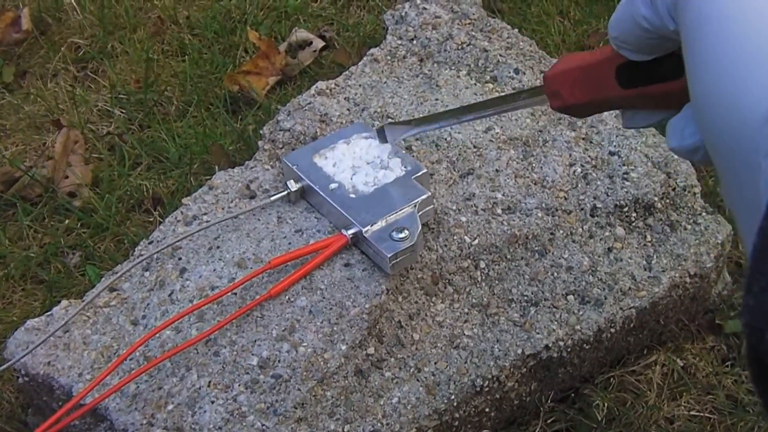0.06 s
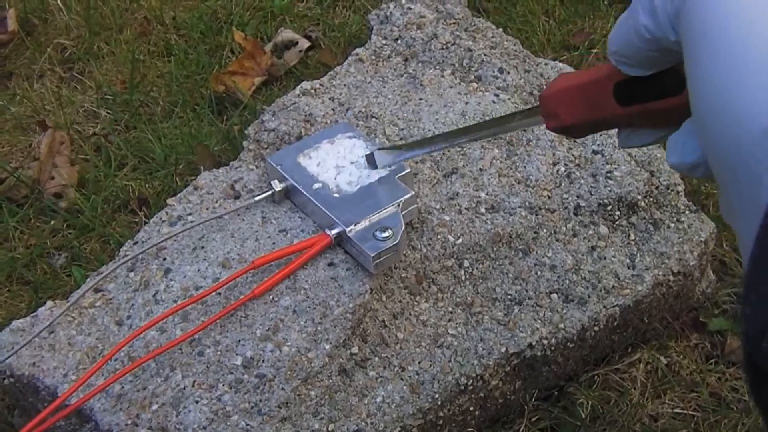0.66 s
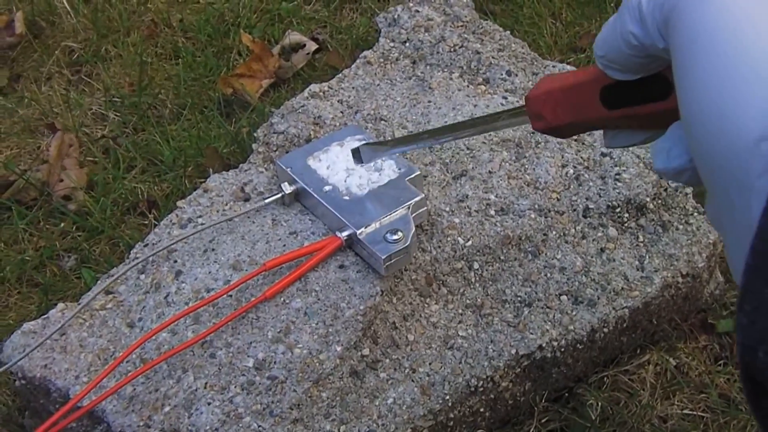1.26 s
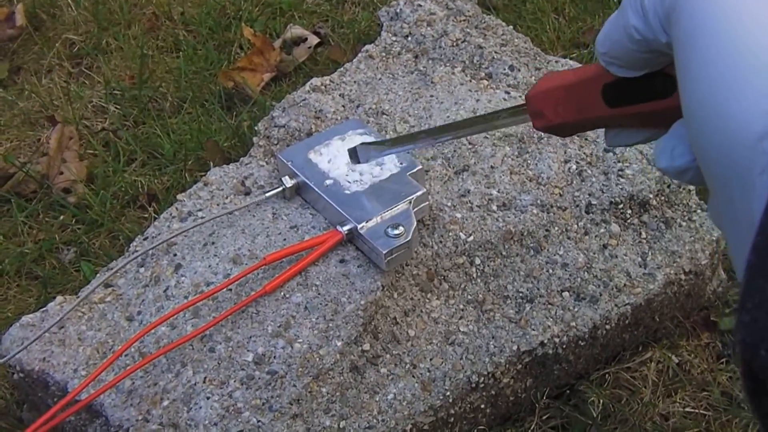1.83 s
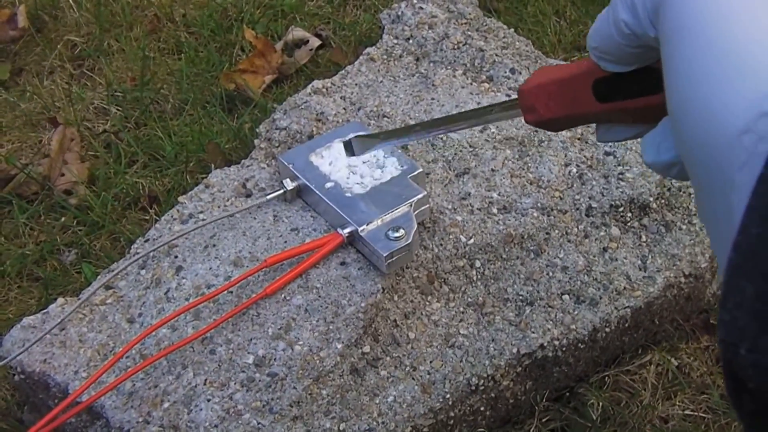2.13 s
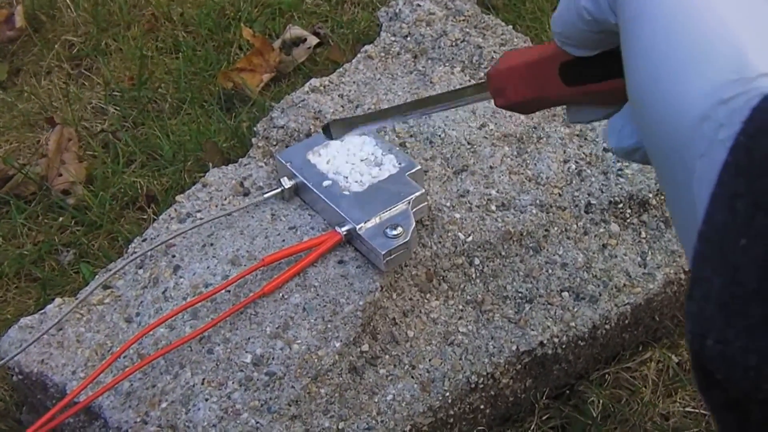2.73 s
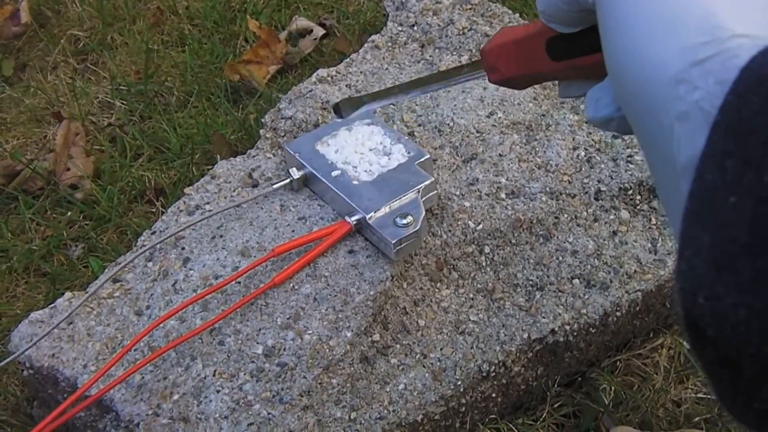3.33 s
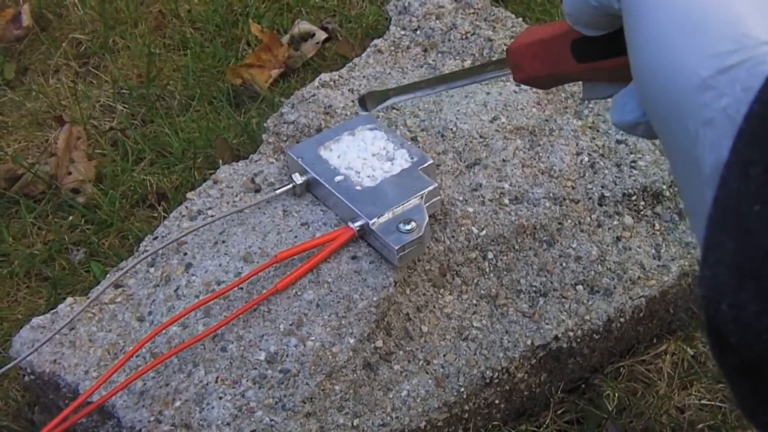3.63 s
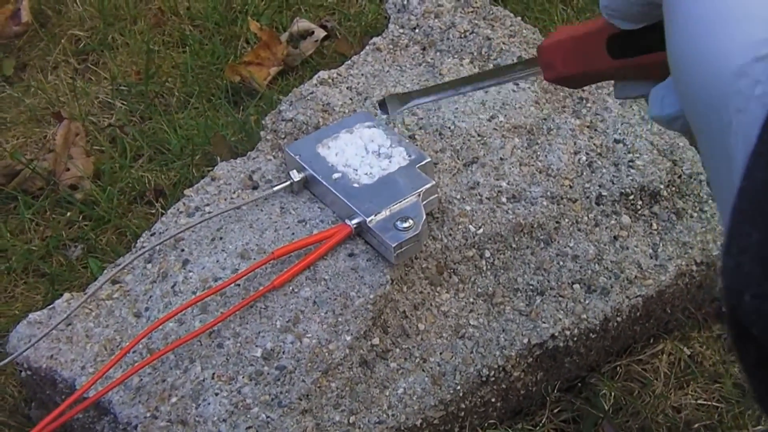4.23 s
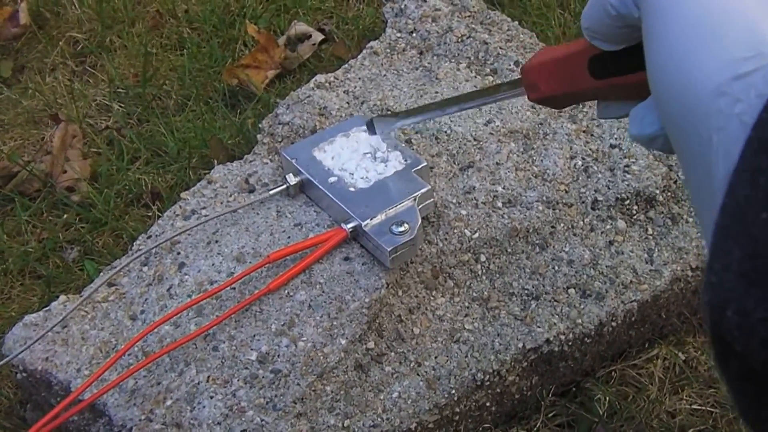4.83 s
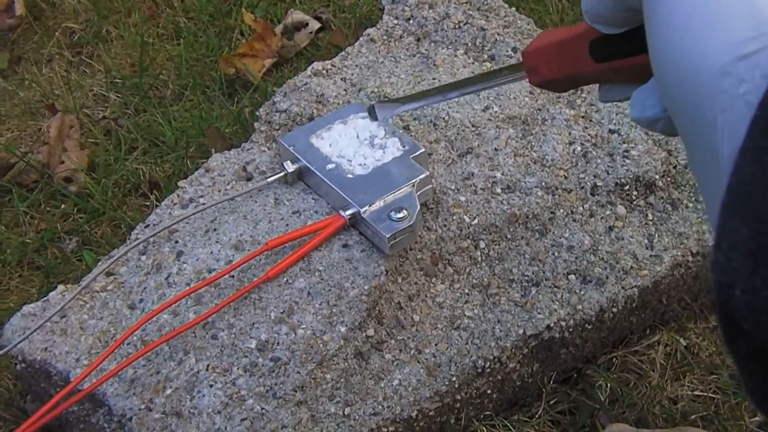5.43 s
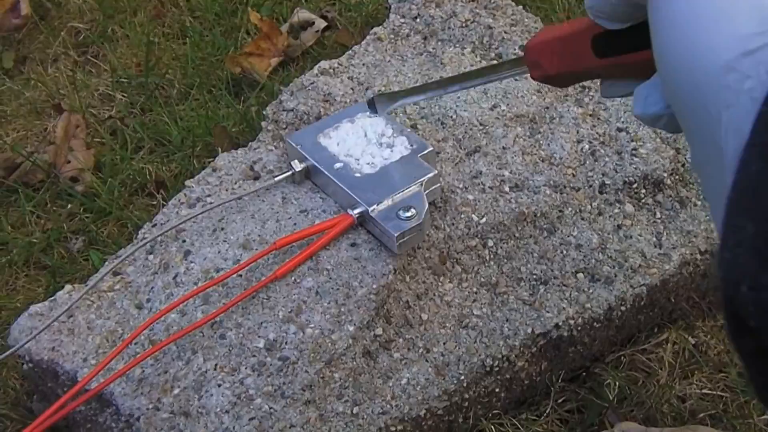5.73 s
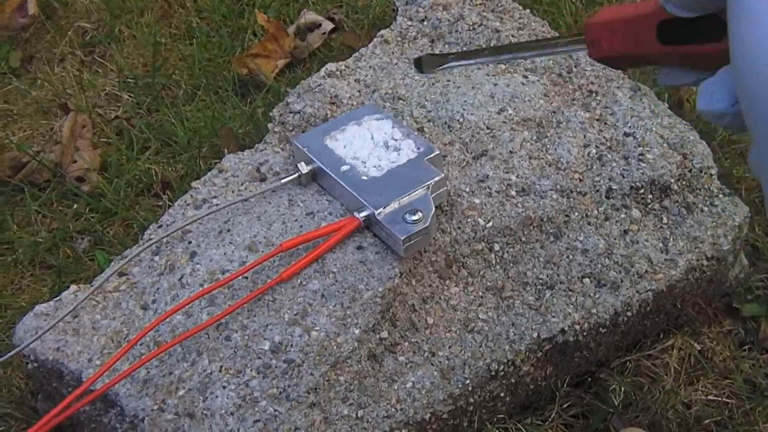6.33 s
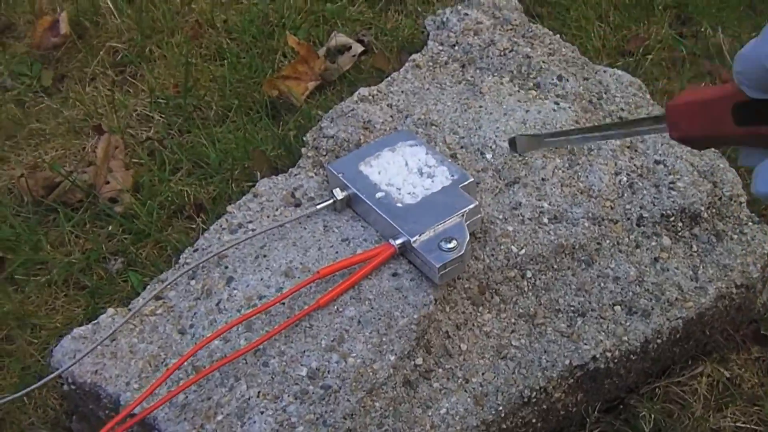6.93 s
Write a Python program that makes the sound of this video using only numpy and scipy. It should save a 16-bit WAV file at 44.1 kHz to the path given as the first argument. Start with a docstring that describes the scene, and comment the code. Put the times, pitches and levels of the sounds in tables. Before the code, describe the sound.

A screwdriver pokes caked crystals in a metal pan with light ringing ticks, then four loud clacks, over faint distant traffic.

```python
"""A steel screwdriver pokes at caked crystals in a small metal pan on a stone slab, outdoors.
Near the stereo microphone, each poke knocks dully and sets the steel ringing; the crust crunches faintly.
As the hand draws back, four hard clacks land close to the microphone and overload the recorder.
Far off, traffic passes and a small bird calls, over soft rustling and steady hiss."""
import sys
import numpy as np
from scipy import signal
from scipy.fft import rfft, irfft
from scipy.io import wavfile

SR = 44100
rng = np.random.default_rng(int(sys.argv[2]) if len(sys.argv) > 2 else 0)


def transcribe(signal):
    """Save signal, clipped to [-1, 1], as a 16-bit WAV file at the path in sys.argv[1]."""
    frames = np.atleast_2d(signal).T
    limited = np.clip(frames, -1, 1)
    pcm = np.round(limited * 32767).astype(np.int16)
    wavfile.write(sys.argv[1], SR, pcm)


N = 312228
TIME, RING_TIME = np.arange(N) / SR, np.arange(SR // 6) / SR
BINS = np.fft.rfftfreq(N, 1 / SR)

# spectra of the traffic's rumble, its tyre wash, the rustle and the hiss: f/Hz, relative level/dB
RUMBLE_SPECTRUM = [(20, -37), (35, -26), (50, -8), (62, -9), (80, -3), (105, 1), (140, -1.5), (200, -7.5),
                   (280, -22.5), (500, -41.5)]
TYRE_SPECTRUM = [(300, -8.5), (600, -10), (900, -3), (1200, -0.5), (1500, 2), (1800, -2), (2300, -4.5),
                 (3200, -7.5), (5000, -13.5), (8000, -39), (15000, -44)]
RUSTLE_SPECTRUM = [(200, -17), (290, -14), (390, 0), (480, -2), (650, -9), (900, -10), (1500, -35)]
HISS_SPECTRUM = [(100, -31), (3000, -5), (5500, 4.5), (7000, 2.5), (9000, 1), (12000, -1.5), (16000, -1.5)]
# likeness of the background at the two microphone ports: f/Hz, correlation (-1..1)
AIR_CORRELATION = [(60, 0.8), (130, 0.98), (290, 0.64), (640, 0.6), (1400, 0.75), (3100, -0.35),
                   (6800, -0.35), (15000, 0.13)]
# swells of the rustle: middle t/s, half width/s, level/dB
RUSTLE_SWELLS = [(0.03, 0.052, -52), (2.22, 0.26, -50.5), (3.6, 0.15, -55), (4.45, 0.33, -48.5),
                 (6.43, 0.24, -51)]
# a far bird's calls: t/s, level/dB
BIRD_CALLS = [(0.564, -61), (2.830, -63), (4.175, -65), (5.255, -63), (7.012, -64)]
# dull bumps of handling: t/s, level/dB, f/Hz
HANDLING_BUMPS = [(1.256, -31.5, 440), (3.5504, -31.5, 472), (3.983, -37, 129), (5.853, -29.5, 556)]
# crust crumbling under the tip: t/s, length/s, level/dB
CRUST_CRUNCHES = [(1.45, .010, -46), (1.459, .012, -47), (2.327, .008, -54), (2.574, .008, -50),
                  (2.613, .012, -50), (3.893, 0.045, -50.5), (4.023, .016, -48), (5.657, .012, -48)]
# close clacks: t/s, blow/dB, favoured f/Hz, fall below and above it/(dB/octave), bounce/ms, bounce/dB
CLACK_BLOWS = [(6.4351, -5.5, 2500, 20, 12, 1.177, -3), (6.6130, 3.5, 2720, 21, 6.5, 1.3, -6.5),
               (6.7488, 6.5, 3580, 8, 12.5, 0.538, -17.5), (6.9296, 0.3, 1660, 24.5, 7.5, 1.06, -8)]
# light pokes: t/s, knock/dB, knock's tilt/(dB/octave), ping/dB, grit/dB
TIP_POKES = [(0.9601, -26, -3, -33, -35), (0.9672, -32.5, 6, -30, -41), (1.1950, -38.5, -8, -45, -47),
             (1.4590, -46, 0, -47, -50), (1.6962, -26, -3.5, -32, -38), (1.7336, -41.5, -8, -50, -55),
             (2.0002, -30, 0, -32.5, -42), (2.0220, -35.5, -5, -49, -55), (2.8802, -33, 21, -31, -30.5),
             (3.4543, -21.5, 7, -46, -31), (3.7351, -29.5, -5, -37.5, -36.5), (3.7586, -26, 3, -48, -45),
             (3.7675, -33, 2, -46, -50), (4.7291, -20.5, 3.5, -33, -39), (5.0553, -20.5, 2, -34.5, -39),
             (5.3690, -31.5, -2, -44.5, -59), (6.4418, -29, 1, -47, -27), (6.4655, -42, 2, -54, -33),
             (6.4773, -37, 13, -56, -44), (6.7354, -34, 3, -52, -29)]
# modes of the body that clacks, the tip's knock, the steel's ping: f/Hz, relative level/dB, t60/s
BODY_MODES = [(830, 0.5, 0.0071), (1320, 2, 0.0072), (1690, -8.5, 0.012), (1915, -3, 0.0072),
              (2485, -8.5, 0.015), (2720, -4.5, 0.0045), (4187, 0.5, 0.0086), (4840, -4, 0.0053),
              (5660, 6.5, 0.0053), (6460, 1, 0.0094), (7260, 3.5, 0.0064), (8610, 3.5, 0.0045),
              (9670, 4, 0.0052), (10830, 3, 0.0027), (12510, 14.5, 0.0045), (15500, -4, 0.0029)]
KNOCK_MODES = [(435, -16.5, 0.023), (960, -2.5, 0.0065), (1280, -7, 0.012), (1770, 0, 0.011),
               (2070, 5.5, 0.008), (2566, -4.5, 0.013)]
PING_MODES = [(4740, -5, 0.018), (4850, -1, 0.068), (13500, -19, 0.023)]
# the steel's low tone and the slab's thud: f/Hz, relative level/dB, t60/s
STEEL_MODE = (1718, -8.5, 0.093)
SLAB_MODE = (483, -27, 0.017)
# near sounds at the left port against the right: f/Hz, level/dB
LEFT_SHADE = [(500, -3), (1300, -1), (2500, -1.5), (4200, 1.5), (5600, -10.5), (9000, -8.5), (12000, -5),
              (16000, -1)]
# how far the left port trails on near sounds: f/Hz, phase/rad
LEFT_PHASE_LAG = [(100, 0), (1000, 0.44), (2500, 0.54), (5500, 1.16), (7000, 2.47), (10500, 1), (12300, 8),
                  (16000, 8)]


def amp(db):
    """Decibels to gain."""
    return 10 ** (np.asarray(db) / 20)


def unit(x):
    """Scales to rms 1."""
    return x / np.sqrt(np.mean(x ** 2) + 1e-20)


def curve(points, hz):
    """Reads (f/Hz, value) rows on a log-frequency axis."""
    f, value = np.transpose(points)
    return np.interp(np.log(hz + 1), np.log(f), value)


def add(mix, s, sound):
    """Mixes a sound in at time s."""
    part = mix[round(s * SR):][:len(sound)]
    part += sound[:len(part)]


def band(x, lo_hz, hi_hz):
    """Gentle band-pass."""
    return signal.sosfilt(signal.butter(2, [lo_hz, hi_hz], "band", fs=SR, output="sos"), x)


def ring(modes, rise_s):
    """Damped modes of a blow; neighbours swing in opposite directions."""
    swing = sum((-1) ** k * amp(db - 60 * RING_TIME / t60) * np.sin(2 * np.pi * hz * RING_TIME)
                for k, (hz, db, t60) in enumerate(modes))
    return swing * (1 - np.exp(-RING_TIME / rise_s))


def burst(t60):
    """A puff of noise that dies away."""
    return rng.standard_normal(len(RING_TIME)) * amp(-60 * RING_TIME / t60)


def waver(hold_s):
    """Slow random wandering of rms 1."""
    return unit(irfft(rfft(rng.standard_normal(N)) * np.exp(-(BINS * hold_s) ** 2), N))


def air_noise(spectrum):
    """Stereo noise, alike at both ports in the bass and largely unrelated in the treble."""
    left, unrelated = rfft(rng.standard_normal((2, N)))
    likeness = curve(AIR_CORRELATION, BINS)
    right = likeness * left + np.sqrt(1 - likeness ** 2) * unrelated
    return unit(irfft(np.array([left, right]) * amp(curve(spectrum, BINS)), N))


def rustle():
    """A soft, low rustle around the microphone swells now and then, carrying some bass with it."""
    swell_power = sum(amp(db) ** 2 * np.exp(-((TIME - s) / width) ** 2)
                      for s, width, db in RUSTLE_SWELLS)
    rest_power = amp(-54.5) ** 2
    rustling = np.sqrt(rest_power + swell_power) * air_noise(RUSTLE_SPECTRUM)
    bass = amp(-1.5) * np.sqrt(swell_power) * air_noise(RUMBLE_SPECTRUM)
    return rustling + bass


def traffic():
    """One far pass: tyre wash swells and recedes with distance, the uneven rumble less so."""
    nearest_s, half_width_s = 4.7, 0.84
    distance_db = -4 * np.log10(1 + ((TIME - nearest_s) / half_width_s) ** 2)
    tyres = amp(-45.5 + distance_db) * air_noise(TYRE_SPECTRUM)
    rumble = amp(-50.5 + 0.56 * distance_db + 1.5 * waver(hold_s=0.64)) * air_noise(RUMBLE_SPECTRUM)
    return tyres + rumble


def engine():
    """A distant engine drones just after the pass and lingers faintly."""
    on_s, rise_s, off_s, fall_s = 4.72, 0.18, 5.5, 0.16
    full_db, late_db = -51, -60.5
    rise = np.clip((TIME - on_s) / rise_s, 0, 1)
    release = np.exp(-np.maximum(TIME - off_s, 0) / fall_s)
    level = rise * amp(late_db + (full_db - late_db) * release)
    hz = 97.8 + 1.15 * waver(hold_s=0.6)
    return level * np.sqrt(2) * np.sin(2 * np.pi * np.cumsum(hz) / SR)


def bird():
    """A thin, far whistle arches up, smeared by echoes from the trees."""
    out, t = np.zeros(N), np.arange(int(0.036 * SR)) / SR
    hz = 7100 + 600 * np.sin(np.pi * t / .066)
    call = np.sin(2 * np.pi * np.cumsum(hz) / SR) * signal.windows.tukey(len(t), .25)
    for s, db in BIRD_CALLS:
        add(out, s, amp(db) * call)
    echoes = np.array([signal.fftconvolve(out, burst(t60=.35))[:N] for side in range(2)])
    return out + amp(-24) * echoes


def handling():
    """Soft low knocks with a little scuff, the same in both channels."""
    out = np.zeros(N)
    for s, db, hz in HANDLING_BUMPS:
        knock = ring([(hz, 1, .022)], rise_s=0.0006)
        scuff = band(burst(t60=0.027), 300, 1900)
        add(out, s, amp(db) * (knock + scuff))
    return out


def crunches():
    """Tiny grains of crust break in short bright clumps."""
    out = np.zeros(N)
    for s, length_s, db in CRUST_CRUNCHES:
        count = int(length_s * SR)
        grains = rng.standard_normal(count) * rng.exponential(1, count)
        add(out, s, amp(db) * unit(band(grains, 5900, 16500)) * signal.windows.tukey(count, .5))
    return out


def bounce(x, ms, db):
    """Adds a weaker repeat of a blow, an instant later."""
    hz = np.fft.rfftfreq(len(x), 1 / SR)
    delay = np.exp(-2j * np.pi * hz * ms / 1000)
    return irfft(rfft(x) * (1 + amp(db) * delay), len(x))


def clacks():
    """Close blows on a hard body bounce and grate; steel rings, the slab thuds, faint noise trails."""
    out = np.zeros(N)
    steel_hz, _, steel_t60 = STEEL_MODE
    for s, blow_db, centre_hz, fall_below, fall_above, bounce_ms, bounce_db in CLACK_BLOWS:
        def force_db(hz):
            """The blow weakens on either side of the pitch it favours."""
            octaves = np.log2(hz / centre_hz)
            return blow_db + min(fall_below * octaves, -fall_above * octaves)
        body = ring([(hz, db + force_db(hz), t60) for hz, db, t60 in BODY_MODES], rise_s=0.00026)
        steel = ring([(steel_hz, force_db(steel_hz) - 24.5, steel_t60)], rise_s=0.001)
        noise_tail = amp(-39) * burst(t60=0.12)
        grating = amp(-21) * burst(t60=0.033)
        grit = band(grating + noise_tail, 600, 10000)
        thud = ring([SLAB_MODE], rise_s=0.00078)
        add(out, s, bounce(body, bounce_ms, bounce_db) + steel + amp(blow_db) * (grit + thud))
    return out


def pokes():
    """The screwdriver's tip meets the crust: a dead knock, a spit of grit and the tones of the steel."""
    out = np.zeros(N)
    pivot_hz, ping_share = 2000, 0.19
    for s, knock_db, tilt, ping_db, grit_db in TIP_POKES:
        modes = [(hz, db + tilt * np.log2(hz / pivot_hz), t60) for hz, db, t60 in KNOCK_MODES]
        knock = amp(knock_db) * ring(modes, rise_s=0.00026)
        # the low tone mostly follows the blow; the ping depends on where the tip lands
        low_tone = amp(knock_db + ping_share * (ping_db - knock_db)) * ring([STEEL_MODE], rise_s=0.0004)
        ping = amp(ping_db) * ring(PING_MODES, rise_s=0.00039)
        grit = amp(grit_db) * band(burst(t60=0.024), 2100, 10400)
        add(out, s, knock + low_tone + ping + grit)
    return out


def scene():
    """Near sounds favour the microphone's right port; the outdoors surrounds both."""
    right = pokes() + clacks() + crunches()
    shade = amp(curve(LEFT_SHADE, BINS)) * np.exp(-1j * curve(LEFT_PHASE_LAG, BINS))
    left = irfft(rfft(right) * shade, N)
    events = np.array([left, right]) + handling() + bird()
    background = rustle() + traffic() + engine() + amp(-54) * air_noise(HISS_SPECTRUM)
    balance_db = [[-.4], [.3]]  # left, right
    return events + background * amp(balance_db)


def record(dry):
    """A narrow dip in the microphone's treble, overload at full scale, then the band limit."""
    dip_hz, dip_width_hz, edge_hz = 7930, 220, 15950
    dip = amp(-7 * np.exp(-((BINS - dip_hz) / dip_width_hz) ** 2))
    clipped = np.clip(irfft(rfft(dry) * dip, N), -1, 1)
    low_pass = signal.firwin(511, edge_hz, window=("kaiser", 9), fs=SR)
    return signal.oaconvolve(clipped, low_pass[None], "same")


dry = scene()
out = record(dry)
transcribe(out)
```